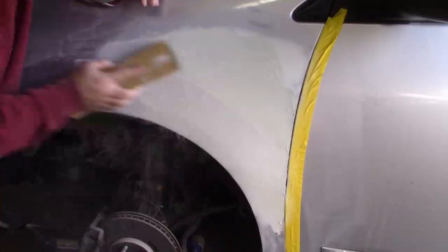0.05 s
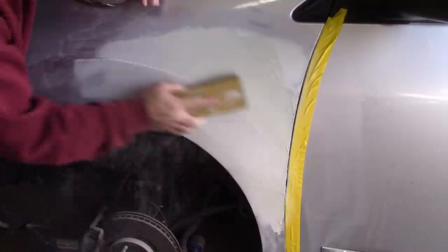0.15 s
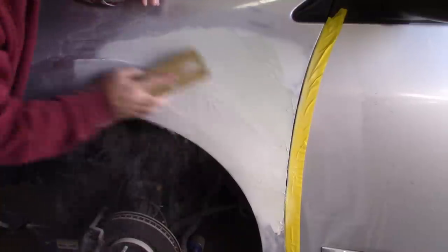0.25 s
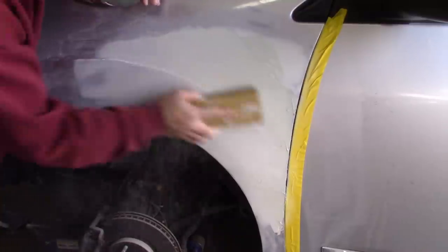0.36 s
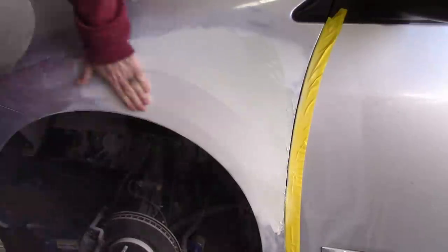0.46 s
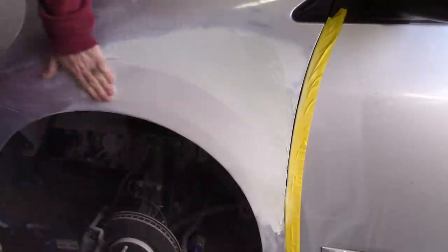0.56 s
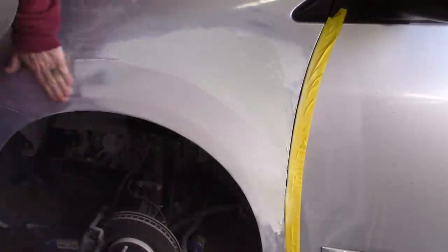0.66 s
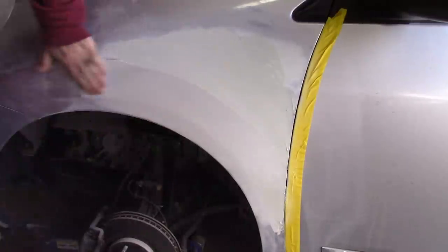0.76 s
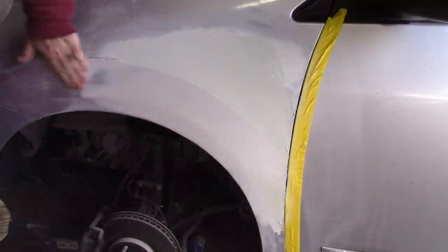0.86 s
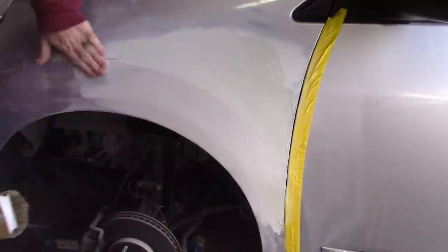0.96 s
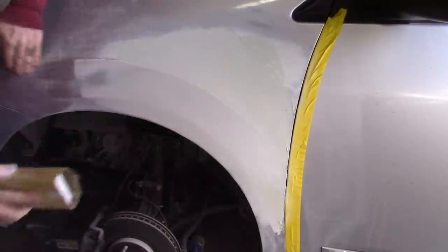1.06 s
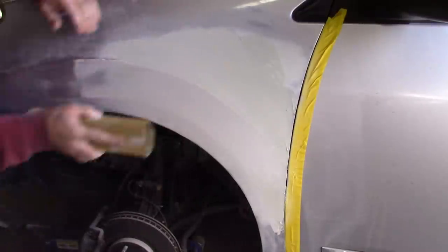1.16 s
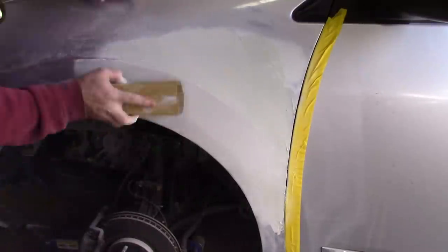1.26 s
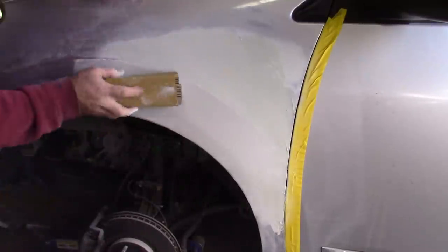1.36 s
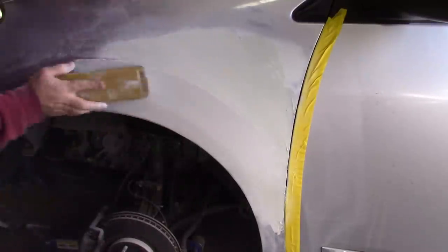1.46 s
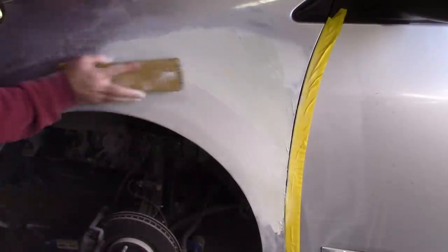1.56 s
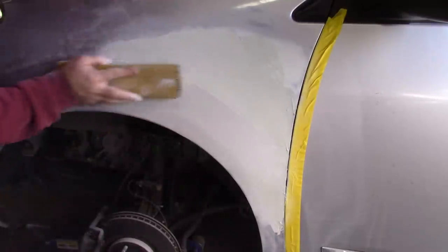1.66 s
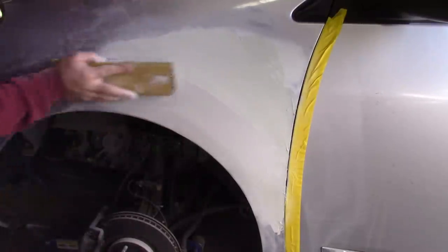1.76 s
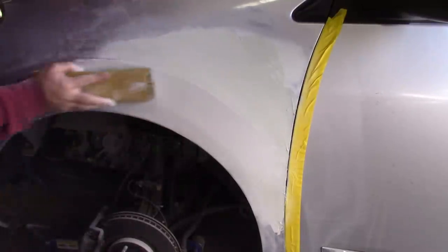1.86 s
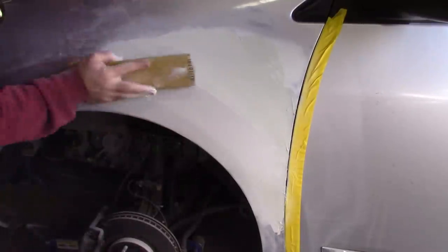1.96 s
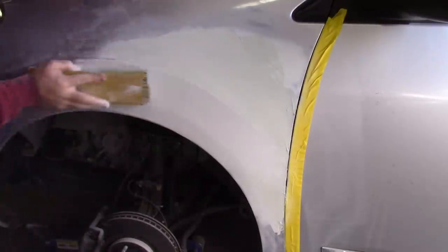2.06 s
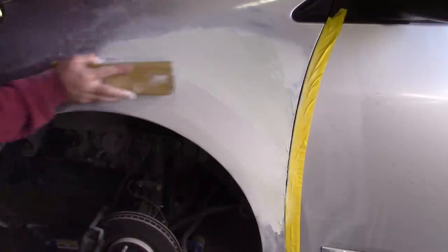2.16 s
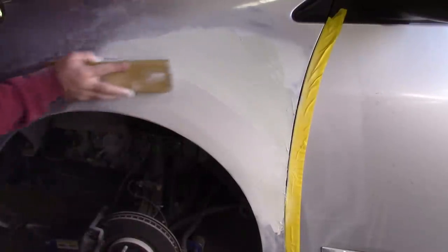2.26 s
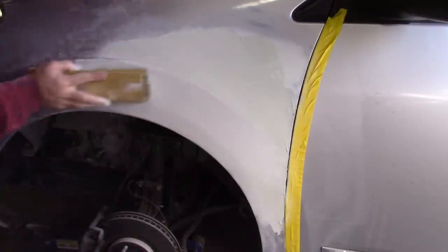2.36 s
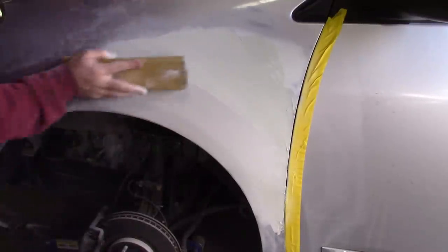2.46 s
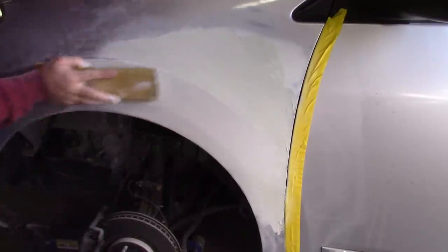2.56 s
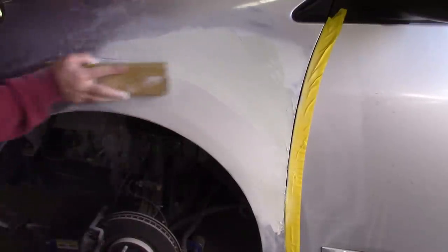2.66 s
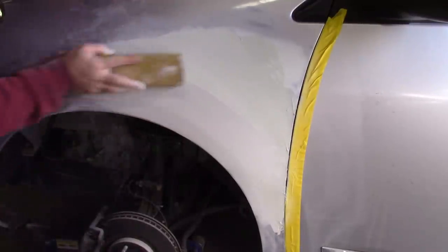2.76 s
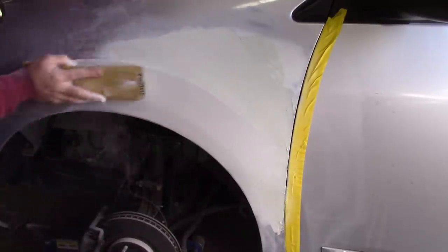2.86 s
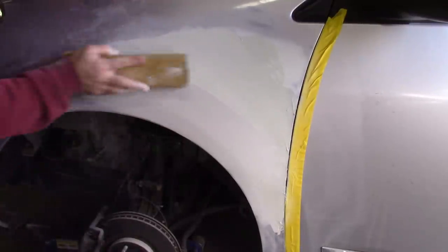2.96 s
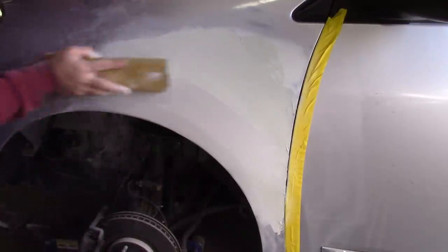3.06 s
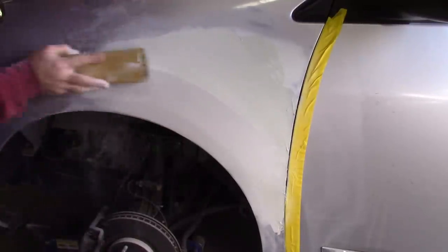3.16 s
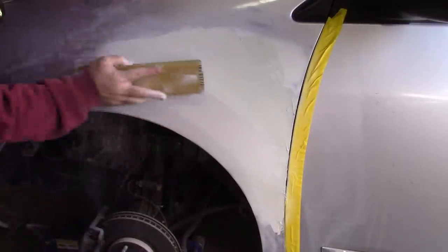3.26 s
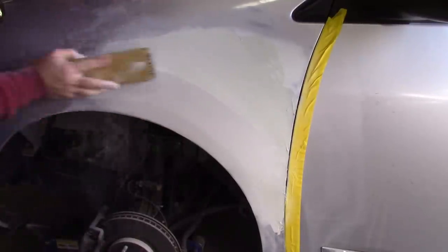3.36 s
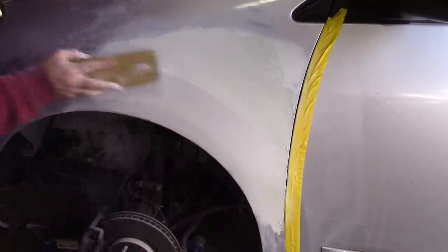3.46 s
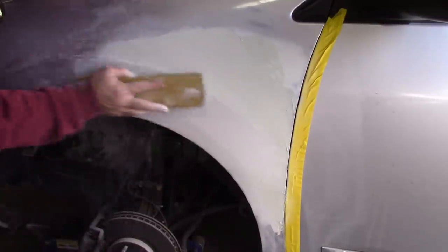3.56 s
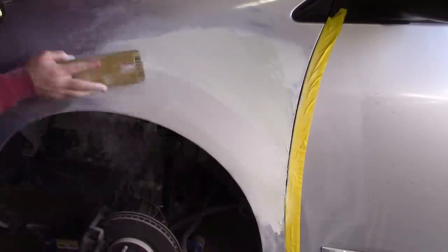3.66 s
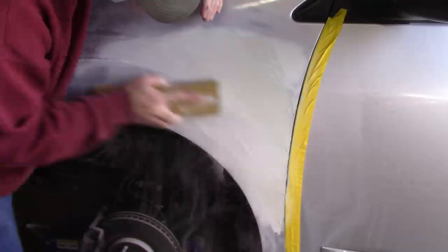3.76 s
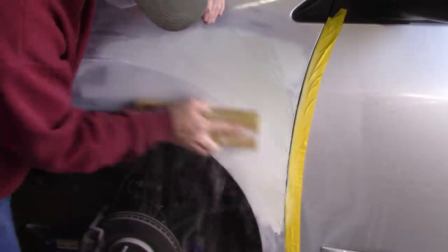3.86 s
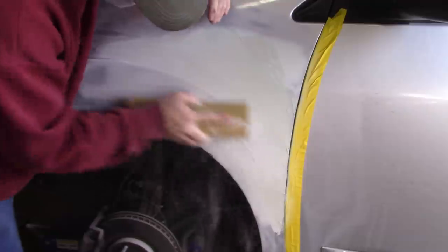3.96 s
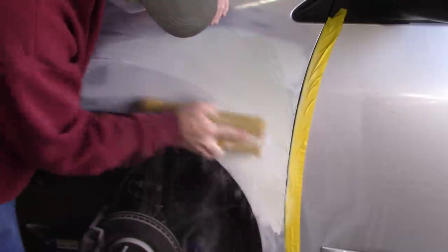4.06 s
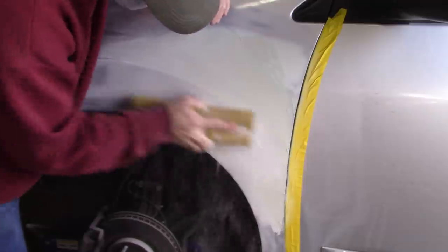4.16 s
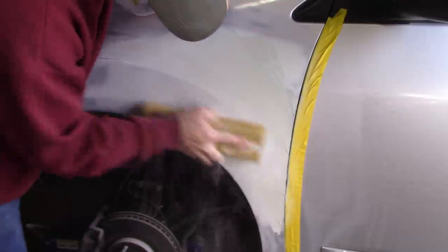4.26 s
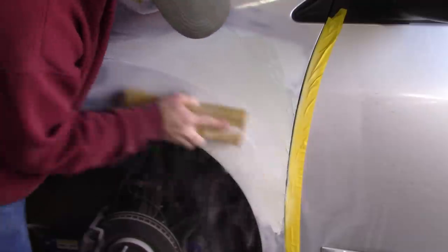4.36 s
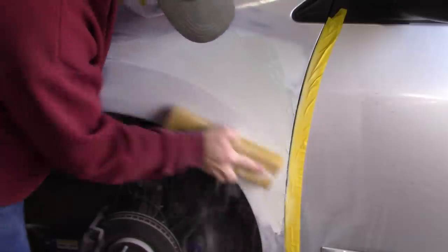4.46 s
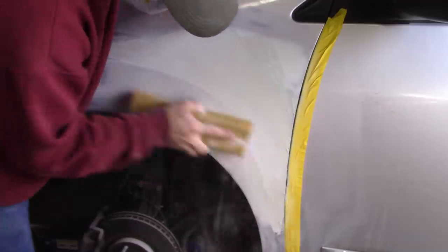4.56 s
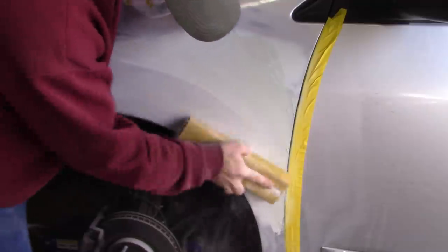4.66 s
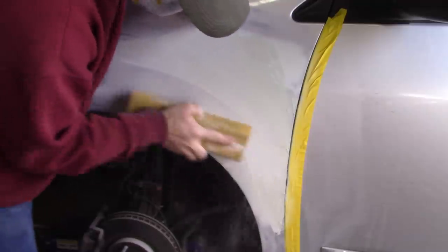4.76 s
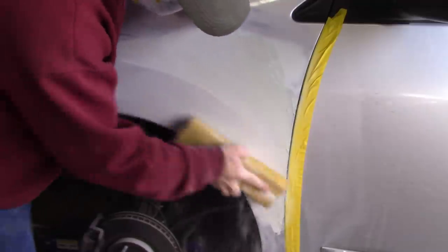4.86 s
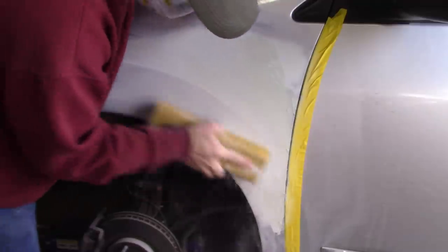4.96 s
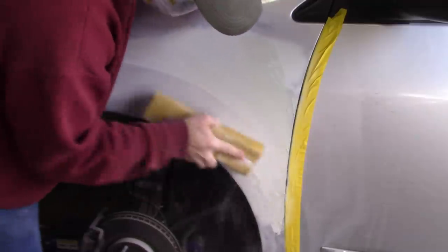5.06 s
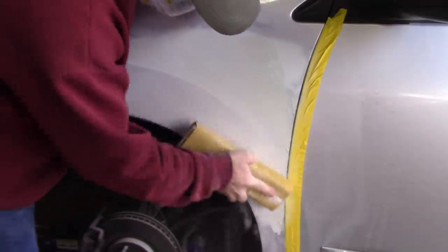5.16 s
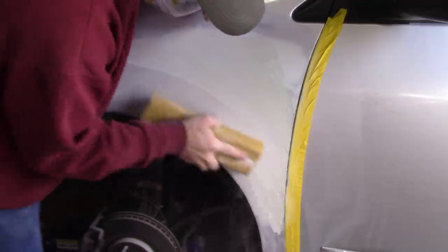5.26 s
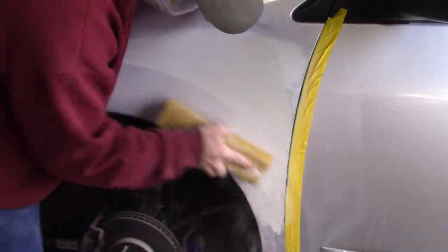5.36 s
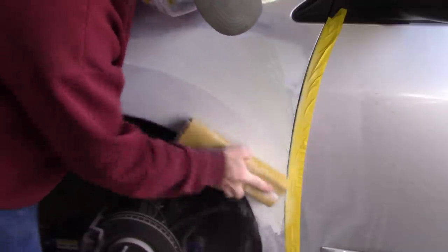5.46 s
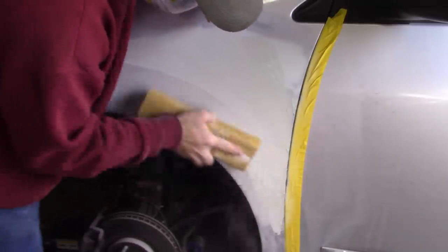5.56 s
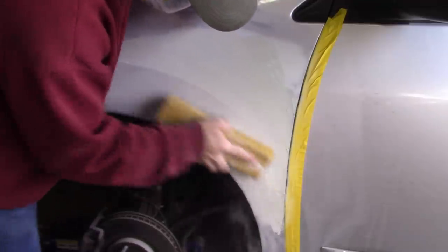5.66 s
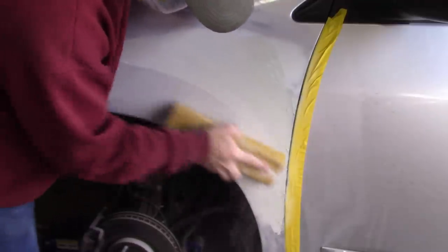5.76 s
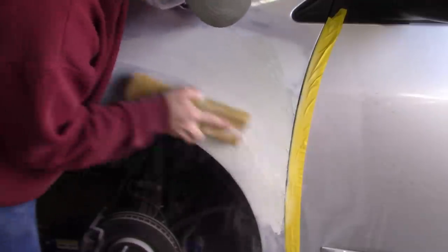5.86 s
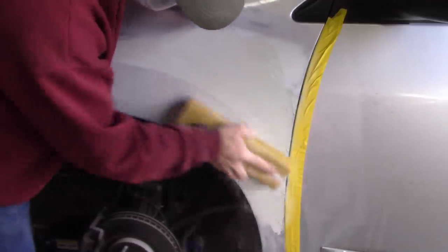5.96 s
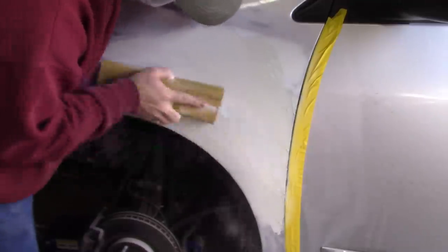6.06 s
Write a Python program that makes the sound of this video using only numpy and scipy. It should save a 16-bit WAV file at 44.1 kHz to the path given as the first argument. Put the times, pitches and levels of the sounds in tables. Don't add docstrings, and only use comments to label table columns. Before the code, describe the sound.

In a garage, close to a stereo microphone, a sanding block is already rubbing hard at 0 s, its bright, gritty strokes reversing about every tenth of a second. At about 0.52 s the sound drops out for an instant, then a bare palm wipes dust until 1.1 s with soft, broad, quieter swishes. Between 1.15 and 1.45 s the block is set back: a tick, short paper scuffs, thin faint squeaks and a firmer scrape. From 1.45 to 3.75 s quick, even strokes hiss to and fro, moderately loud, with the steel ringing hollowly, droning low and thudding softly. After another tiny gap near 3.77 s, the sanding returns louder, brighter and grittier, with dull knocks at some turns. From 4.9 s the strokes alternate stronger and weaker, growing forceful near 5.6 s and continuing to the end around 6.1 s. Short wall reflections surround everything.

```python
import sys
import numpy as np
from scipy import signal
from scipy.fft import rfft, irfft
from scipy.io import wavfile
from scipy.ndimage import uniform_filter1d

SR = 44100
rng = np.random.default_rng(int(sys.argv[2]) if len(sys.argv) > 2 else 0)


def convert_level_to_amplitude(level_db):
    exponent = np.asarray(level_db, float) / 20
    return 10 ** exponent


def unload_audio(sound):
    columns = np.transpose(np.atleast_2d(sound))
    steps = np.round(np.clip(columns, -1, 1) * 32767)
    wavfile.write(sys.argv[1], SR, steps.astype(np.int16))


N = 269892
T = np.arange(N) / SR
HZ = np.maximum(np.fft.rfftfreq(N, 1 / SR), 1)

# (frequency [Hz], level [dB])
GARAGE_AIR = [(24, -54), (40, -23), (502, -1), (728, 24), (1650, -12), (1820, 1), (1960, -36), (4340, -58),
              (15000, -54)]
GARAGE_AIR_DB = -57
# (frequency [Hz], likeness [0-1])
ALIKE = [(40, 1), (130, 0.33), (270, 0.87), (600, 0.83), (1200, 0.58), (5000, 0.57), (12000, 0.58)]

# (time [s], peak [dB], length [s],
# centre [Hz])
SCUFFS = [
    (1.16, -44, .006, 2400),
    (1.2, -28, 0.00066, 4500),
    (1.202, -44, 0.013, 900),
    (1.252, -34.5, 0.011, 2400),
    (1.294, -35, 0.0058, 2400),
    (1.316, -35, .014, 2000),
    (1.34, -27.5, 0.026, 1420),
    (1.381, -31.5, 0.021, 1600),
    (1.423, -31.5, 0.08, 2010),
    (1.466, -23, 0.065, 2480),
]
# (start [s], end [s], pitch [Hz], level [dB])
SQUEAKS = [
    (1.163, 1.2, 6277, -65),
    (1.155, 1.177, 4200, -65),
    (1.174, 1.217, 4200, -59),
    (1.214, 1.256, 4200, -66),
    (1.16, 1.2, 1803, -61),
    (1.198, 1.254, 1803, -54),
    (1.275, 1.4, 1803, -59),
]

# (frequency [Hz], width [Hz], height above the colour [dB])
WING_MODES = [
    (138, 23, 6.5),
    (266, 56, 4),
    (467.5, 6.7, 9.5),
    (534.5, 26, 6.5),
    (728, 10, 6.5),
    (1410, 34, 4.5),
    (1830, 38, -0.5),
]
# (frequency [Hz], level [dB])
DRONE = [(88, -38), (150, -11), (210, -8), (263, -4), (330, -0.5), (360, -1), (522, -3), (600, -1.5),
         (780, -29), (1320, -120)]
# (frequency [Hz], level [dB])
DEEP = [(15, -49), (25, -17), (59, -4.5), (97, -2.5), (135, -1.5), (167, -16), (200, 0), (260, -39),
        (440, -120)]
# (time [s], give [dB])
HOLLOW = [(0, 0), (.5, 0), (.55, 1.5), (.78, 0), (1.1, -3), (1.2, 1), (1.3, -4), (1.45, -4), (1.7, 2.5),
          (2.3, -0.3), (3.3, -0.1), (3.75, -2.7), (3.8, -3.5), (4.3, -0.7), (4.8, 2), (5.3, 4), (5.7, 0.8),
          (6.12, -1)]
RING_GIVE, DRONE_GIVE = 0.21, 0.39
DRONE_DB, DRONE_REST_DB, DRONE_EFFORT = -46, -56, 0.55
LURCH_DB, LURCH_S = 3.5, 0.011
# (time [s], peak [dB])
KNOCKS = [(0.088, -44.6), (0.301, -50), (2.927, -42), (3.108, -40), (3.343, -50), (3.415, -36),
          (3.888, -55), (3.998, -49), (4.08, -34), (4.664, -49), (5.014, -48), (5.255, -47), (5.33, -43),
          (5.4, -40), (5.488, -36), (5.636, -42.5), (5.873, -47), (5.97, -38.3), (6.091, -40)]
# (time [s], peak [dB])
THUDS = [(1.953, -53), (2.105, -56), (2.229, -51), (2.594, -55.4), (2.776, -83), (2.863, -50), (2.932, -45),
         (3.026, -56), (3.095, -46), (3.256, -56), (3.355, -52.1), (3.508, -91), (3.571, -48), (3.667, -41),
         (4.033, -55.7), (4.496, -53.4), (4.93, -54.8), (5.549, -55.7), (5.632, -57), (6.078, -56.5)]
KNOCK_HZ, THUD_HZ = 149, 71.6

# (frequency [Hz], level [dB])
SIZZLE = [(3820, -13), (6500, -3), (8250, -1.5), (9830, -3.5), (12600, -13), (14500, -17), (15600, -19.5)]
# (frequency [Hz], level [dB])
HISS = [(2060, -31), (3500, 0.5), (4600, -5), (5330, 0), (7500, -6), (9750, -16), (16500, -120)]
# (frequency [Hz], level [dB])
PALM = [(760, -31), (1300, -32), (1810, -4.5), (3240, -0.5), (3600, -3.5), (5870, -1), (12000, -6),
        (13800, -16), (15600, -16)]
# (frequency [Hz], level [dB])
RING = [(710, -50), (1200, -4), (1430, -8.5), (1540, -3), (1930, -0.5), (2600, 2), (4010, -8), (4800, -7),
        (6240, -9), (10600, -120)]
# (frequency [Hz], level [dB])
RING_LOWER = [(710, -35), (1200, -8.5), (2060, 1.5), (2720, 4), (4800, -11.5), (6240, -21), (10600, -120)]
# (frequency [Hz], level [dB])
BODY = [(240, -50), (400, -15), (522, -12.5), (634, -6), (968, -0.5), (1410, 0.5), (1700, -2.5),
        (2210, -29), (3740, -120)]
PALM_START_S, PALM_END_S = 0.53, 1.13
LOWER_S = 3.776

# (turn [s], hiss [dB], gain across the stroke [dB])
ARCH = [(-0.03, -16, -2), (0.091, -17, -2.5), (0.188, -16, -0.5), (0.3, -17.5, -2.5), (0.392, -16.5, 0.5),
        (0.505, -20.5, -18)]
# (turn [s], hiss [dB], gain across the stroke [dB])
WIPES = [(0.539, -37.5, -3.5), (0.758, -40.5, 5), (0.788, -32, -3.5), (0.876, -32.5, -5.5),
         (0.962, -33.5, -6), (1.027, -40, -8.5)]
# (turn [s], hiss [dB], gain across the stroke [dB])
DRAGS = [(1.147, -70, -5), (1.24, -55, -8), (1.274, -61, 6), (1.33, -49, 5), (1.372, -51.5, -3),
         (1.41, -50, 4)]
# (turn [s], hiss [dB], gain across the stroke [dB])
UPPER = [(1.451, -28.5, -1.5), (1.561, -25.5, 3.5), (1.69, -25, -0.5), (1.78, -23.5, 0.8),
         (1.873, -24, -0.5), (1.958, -22, .1), (2.044, -24.5, -2.5), (2.126, -23, 0.2), (2.213, -24, -1),
         (2.289, -23, -1), (2.375, -24.5, -0.8), (2.449, -22.5, 0), (2.533, -23, -2), (2.61, -21, -1.1),
         (2.696, -21.5, -3.5), (2.774, -22.5, -1.1), (2.858, -23, -3), (2.934, -21.5, 0),
         (3.019, -21, -3.5), (3.094, -22, 1.1), (3.178, -22.5, -1), (3.256, -22.5, 3), (3.341, -22, -0.5),
         (3.415, -21, 1.3), (3.495, -22, -1.5), (3.569, -21, 6.5), (3.655, -22, -2), (3.731, -23, 3)]
# (turn [s], hiss [dB], gain across the stroke [dB])
LOWER = [(3.778, -16, -2.3), (3.87, -16.5, .1), (3.984, -18, -2), (4.077, -17, 1), (4.189, -17.5, -1.5),
         (4.283, -16, 0.5), (4.383, -19, -0.6), (4.474, -17, 1.1), (4.574, -18.5, -2.5), (4.66, -17.5, 0.3),
         (4.748, -21, 0), (4.833, -18, 0.7)]
# (turn [s], hiss [dB], gain across the stroke [dB])
EDGE = [(4.923, -21, -1.5), (5.006, -17.5, 0.3), (5.085, -20.5, -3.7), (5.165, -18, -0.2),
        (5.244, -21.5, -3.5), (5.325, -17.5, 0.7), (5.404, -19.5, -4), (5.481, -17.5, -0.3),
        (5.556, -19.5, -3), (5.635, -15.5, -2), (5.711, -18, -2.5), (5.794, -16, -0.5), (5.875, -16.5, -2),
        (5.966, -16, -.6), (6.057, -16.5, -2.7), (6.14, -29, -6)]
# (hush at far turn [dB], at near turn [dB], panel ring above hiss [dB], panel body above hiss [dB],
# share of a harder stroke the panel ignores [0-1])
PASSAGES = [
    (10, 14, -6, -15.5, 0.27),
    (8.5, 13.5, -2, -10.5, 0.57),
    (8, -3, 8, 10.5, 0.22),
    (19, 13.5, 0.65, -8, 0.36),
    (15.5, 14.5, -5, -12, 0.15),
    (14, 12.5, -4.5, -13, 0.18),
]

# (start [s], end [s])
MONO_TREBLE = [(.17, 0.33), (2.72, 2.78), (3.02, 3.07), (3.6, 3.67), (4.2, 4.37), (5.039, 5.1), (5.66, 5.8),
               (6.03, 6.06)]
# (low [Hz], high [Hz], share of loud time [0-1])
MONO_BASS = [(1, 170, .65), (170, 350, .45), (350, 480, .45), (480, 650, .5)]
# (cut [s], remnant [dB], its sag [dB], remnant ends [s], gap [dB], fade starts [s], full again [s])
SCENE_CHANGES = [
    (.518, -15, 10, .53, -20, .545, .556),
    (3.7555, -21, 3, 3.7735, -70, 3.78, 3.791),
]


def over_hz(table):
    hz, value = np.transpose(table)
    return np.interp(np.log(HZ), np.log(hz), value)


def colour(x, table, skirt_db=24):
    below = np.maximum(np.log2(table[0][0] / HZ), 0)
    above = np.maximum(np.log2(HZ / table[-1][0]), 0)
    y = irfft(rfft(x) * convert_level_to_amplitude(over_hz(table) - skirt_db * (below + above)), N)
    return y / np.sqrt(np.mean(y ** 2))


def walk(rate):
    hold = int(SR / rate)
    steps = np.repeat(rng.standard_normal(N // hold + 1), hold)
    return uniform_filter1d(uniform_filter1d(steps, hold), hold)[:N] * 4 / 3


def garage_air():
    return convert_level_to_amplitude(GARAGE_AIR_DB) * colour(rng.standard_normal((2, N)), GARAGE_AIR)


def echoes(late_s, fade_s):
    age = T[:8192]
    answer = rng.standard_normal(len(age)) * (1 - np.exp(-age / late_s)) * np.exp(-age / fade_s)
    return rfft(answer / np.sqrt(np.sum(answer ** 2)), N)


def handling():
    out, age = np.zeros((2, N)), T[:4096]
    for s, peak_db, length, hz in SCUFFS:
        band = signal.butter(1, [hz / 1.19, hz * 1.17], "band", fs=SR)
        rasp = signal.lfilter(*band, rng.standard_normal((2, len(age))))
        rasp[1] *= 0.5
        swell = 3 * age / length * np.exp(1 - 3 * age / length)
        first = int(s * SR)
        out[:, first:first + len(age)] += convert_level_to_amplitude(peak_db - 5.5) * swell * rasp / np.std(rasp[0])
    for start, end, hz, db in SQUEAKS:
        grip = np.clip(np.minimum(T - start, end - T) / 0.004, 0, 1)
        level = convert_level_to_amplitude(db + 0.8 * walk(60))
        phase = 2 * np.pi * np.cumsum(hz * (1 + 0.001 * walk(50))) / SR
        out[0] += level * grip * np.sin(phase)
    return out


def strokes():
    rows = []
    for table, passage in zip((ARCH, WIPES, DRAGS, UPPER, LOWER, EDGE), PASSAGES):
        far_db, near_db, ring_db, body_db, ignored = passage
        start, early_db, gain_db = np.transpose(table)
        hush_db = np.where(np.arange(len(start)) % 2, near_db, far_db)
        effort_db = early_db + gain_db / 2
        slip_db = ignored * (effort_db - np.median(effort_db))
        give_db = np.interp(start, *np.transpose(HOLLOW))
        rows.append([start, hush_db, early_db, early_db + gain_db,
                     ring_db + RING_GIVE * give_db - slip_db, body_db + give_db - slip_db])
    start, hush_db, early_db, late_db, ring_db, body_db = np.hstack(rows)
    turn_db = np.minimum(early_db, np.roll(late_db, 1)) - hush_db
    return start, turn_db, early_db, late_db, ring_db, body_db


def wing_modes():
    gain = 1
    for hz, width, db in WING_MODES:
        gain = gain + (convert_level_to_amplitude(db) - 1) / (1 + (2 * (HZ - hz) / width) ** 2)
    return gain


def flexing():
    start, _, early_db = strokes()[:3]
    k = np.clip(np.searchsorted(start, T) - 1, 0, len(start) - 1)
    lurch = (T - start[k]) / LURCH_S
    give_db = DRONE_GIVE * np.interp(T, *np.transpose(HOLLOW))
    drone_db = DRONE_DB + DRONE_EFFORT * (early_db[k] + 19) + give_db
    drone_db = drone_db + LURCH_DB * lurch * np.exp(1 - lurch)
    drone_db = uniform_filter1d(np.maximum(drone_db, DRONE_REST_DB), size=400)
    deep_db = -62 + 0.45 * (drone_db + 46) + 1.8 * walk(14)
    out = convert_level_to_amplitude(drone_db + 2.6 * walk(18)) * colour(rng.standard_normal((2, N)), DRONE, 30)
    out += convert_level_to_amplitude(deep_db) * colour(rng.standard_normal((2, N)), DEEP, 30)
    for hz, jolts in ((KNOCK_HZ, KNOCKS), (THUD_HZ, THUDS)):
        age = T[:8192] * hz / 0.82
        knock = age * np.exp(1 - age) * np.sin(2 * np.pi * hz * T[:8192])
        for s, peak_db in jolts:
            part = out[0, int(s * SR):int(s * SR) + 8192]
            part += convert_level_to_amplitude(peak_db - 2.0) * knock[:len(part)]
    return out


def grit(share, spread_db):
    bites = rng.random((2, N)) < np.clip(share, 0.01, 1)
    size = np.minimum(rng.exponential(size=(2, N)), 2)
    return bites * rng.standard_normal((2, N)) * convert_level_to_amplitude(spread_db * size)


def patchy(x, lo_hz, hi_hz, drift_db, count):
    edges, spectrum, out = np.geomspace(lo_hz, hi_hz, count), rfft(x), 0
    place = np.interp(np.log(HZ), np.log(edges), np.arange(count))
    for k in range(count):
        band = irfft(spectrum * np.sqrt(np.clip(1 - abs(place - k), 0, 1)), N)
        out = out + band * convert_level_to_amplitude(drift_db * walk(22.1))
    return out / np.sqrt(np.mean(out ** 2))


def rubbing():
    start, turn_db, early_db, late_db, ring_db, body_db = strokes()
    k = np.clip(np.searchsorted(start, T) - 1, 0, len(start) - 2)
    age, length = T - start[k], start[k + 1] - start[k]
    palm = (T > PALM_START_S) * (T < PALM_END_S)
    upper = (T > PALM_START_S) * (T < LOWER_S)
    progress = np.clip((age / length - 0.3) / 0.45, -0.3, 1.3)
    coast_db = early_db[k] + (late_db - early_db)[k] * progress
    starting = np.cos(np.pi / 2 * np.clip(age / (0.018 + 0.015 * palm), 0, 1)) ** 2.94
    slowing_s = np.minimum(0.42 * length, 0.055)
    stopping = np.clip(1 - (start[k + 1] - T) / slowing_s, 0, 1) ** 2.2
    dip_db = (turn_db[k] - coast_db) * starting + (turn_db[k + 1] - coast_db) * stopping
    chatter_db = 0.6 * walk(130) + 0.1 * walk(40)
    bright_db = -1.2 + 0.12 * (coast_db + 22.5)
    sizzle, hiss, ring, body = (grit(0.6, spread_db=-1.3) for _ in range(4))
    sizzle = colour(sizzle, SIZZLE) * ~palm
    hiss = np.where(palm, convert_level_to_amplitude(5.0) * colour(hiss, PALM), colour(hiss, HISS))
    ring = np.where(upper, colour(ring, RING), colour(ring, RING_LOWER)) * convert_level_to_amplitude(-9.5 * palm)
    body = colour(body, BODY)
    # (rasp, low Hz, high Hz, drift dB, depth of the dip at a turn, dB above the hiss)
    layers = ((sizzle, 6000, 16000, 0.9, 1.12, bright_db),
              (hiss, 3000, 8500, 1.2, 0.96, -3.5),
              (ring, 1000, 5500, 1.5, 0.68, ring_db[k]),
              (body, 300, 2000, 1.8, 0.45, body_db[k]))
    out = 0
    for rasp, lo_hz, hi_hz, drift_db, depth, above_db in layers:
        level_db = uniform_filter1d(coast_db + above_db + depth * dip_db, size=110) + chatter_db
        out = out + convert_level_to_amplitude(level_db) * patchy(rasp, lo_hz, hi_hz, drift_db, count=5)
    return out


def scene():
    air = rfft(garage_air())
    shared, apart = wing_modes() * rfft(rubbing() + flexing()) + rfft(handling())
    alike = np.clip(over_hz(ALIKE), 0, 1)
    shared = shared + convert_level_to_amplitude(-11.5) * apart * echoes(0.0037, 0.037)
    apart = apart * (convert_level_to_amplitude(-23.0) + echoes(0.0093, 0.014))
    mid = irfft(shared * np.sqrt((1 + alike) / 2) + air[0], N)
    side = irfft(apart * np.sqrt((1 - alike) / 2) + convert_level_to_amplitude(-3.0) * air[1], N)
    left, right = convert_level_to_amplitude(-0.46) * (mid + side), convert_level_to_amplitude(-0.8) * (mid - side)
    return convert_level_to_amplitude(0.34) * np.array([left, right])


def fold(left, right):
    mid, side = (left + right) / 2, (left - right) / 2
    spectrum = rfft(side)
    loud = uniform_filter1d(mid ** 2, size=4096) > convert_level_to_amplitude(-60)
    shut = [(4500, SR, sum((T > start) * (T < end) for start, end in MONO_TREBLE))]
    for lo_hz, hi_hz, share in MONO_BASS:
        blocks = np.repeat(rng.random(N // 2048 + 1) < share, 2048)[:N]
        shut.append((lo_hz, hi_hz, loud * blocks))
    for lo_hz, hi_hz, when in shut:
        band = irfft(spectrum * (HZ >= lo_hz) * (HZ < hi_hz), N)
        side = side - uniform_filter1d(1.0 * when, size=700) * band
    return np.array([mid + side, mid - side])


def top_cut(x):
    return signal.sosfilt(signal.butter(12, 15740, fs=SR, output="sos"), x)


def record(dry):
    gain = np.ones(N)
    for cut, remnant_db, sag_db, end, gap_db, restart, full in SCENE_CHANGES:
        times = [cut - 2 / SR, cut, end, end + 20 / SR, restart, full]
        levels = [1, convert_level_to_amplitude(remnant_db), convert_level_to_amplitude(remnant_db - sag_db), convert_level_to_amplitude(gap_db), convert_level_to_amplitude(gap_db), 1]
        gain *= np.interp(T, times, levels)
    return top_cut(fold(*dry) * gain)


dry = scene()
out = record(dry)
unload_audio(out)
```